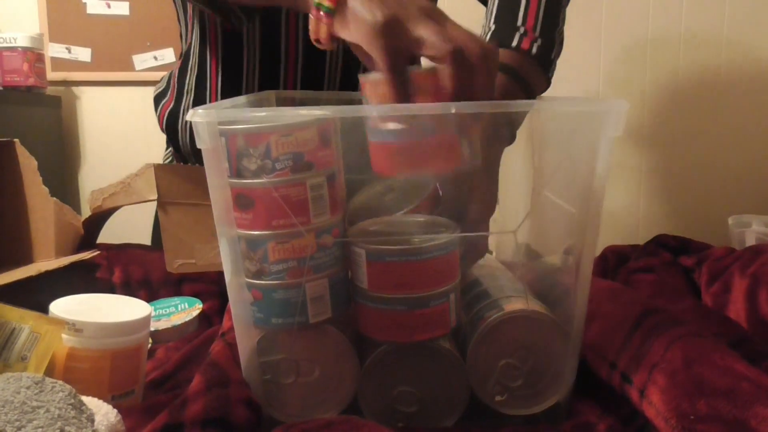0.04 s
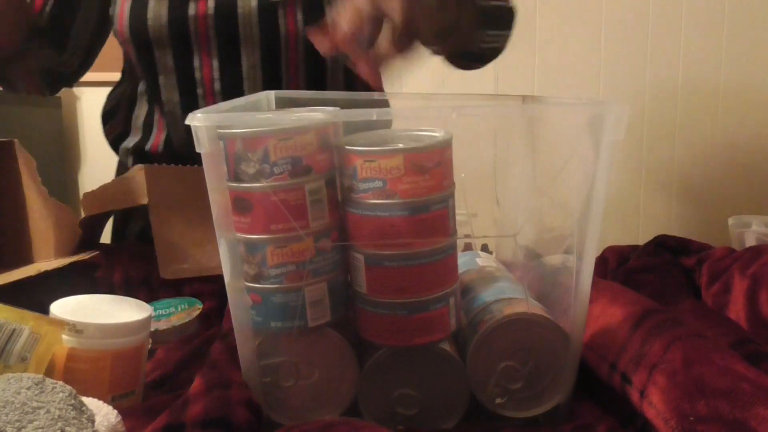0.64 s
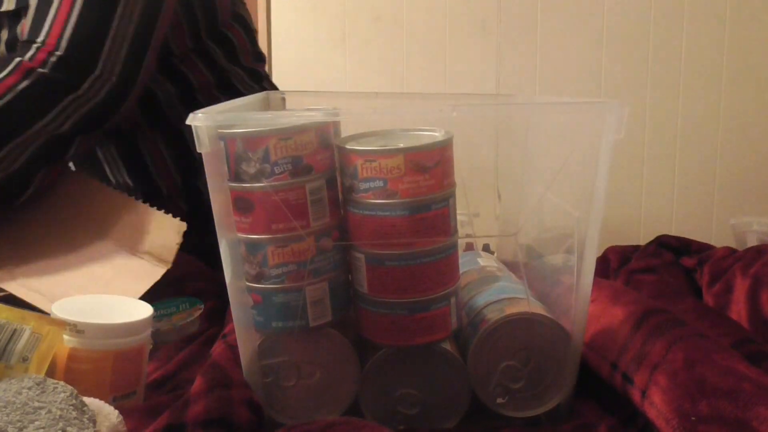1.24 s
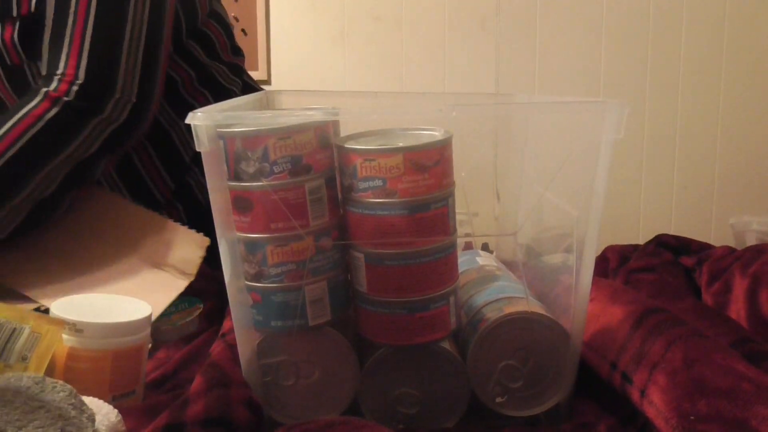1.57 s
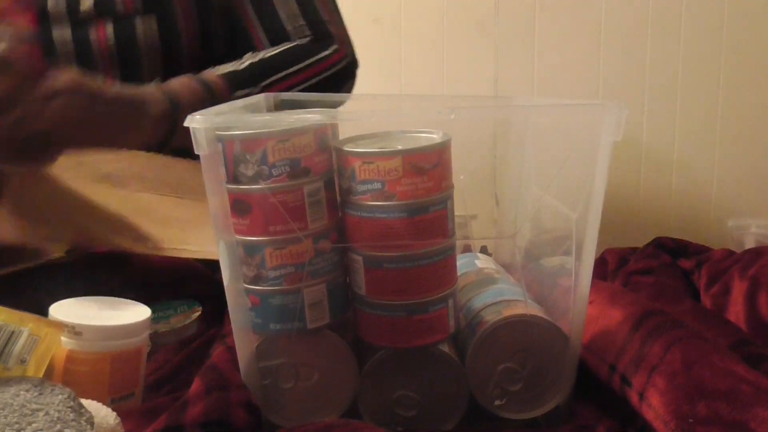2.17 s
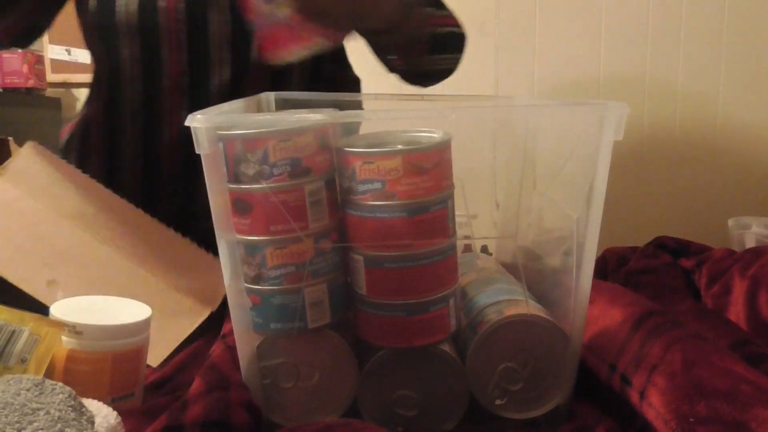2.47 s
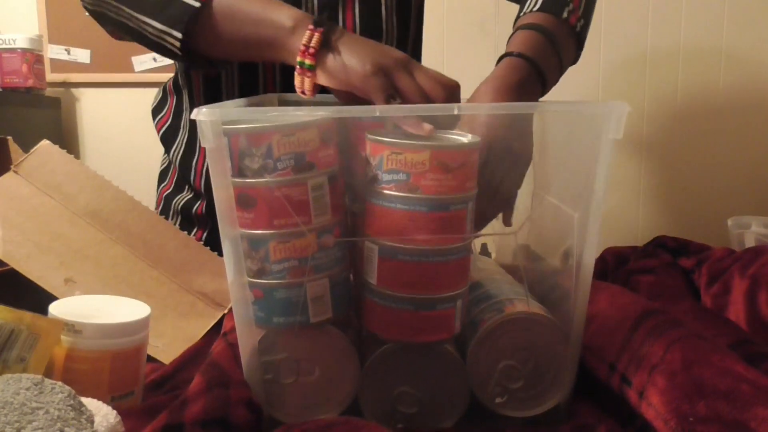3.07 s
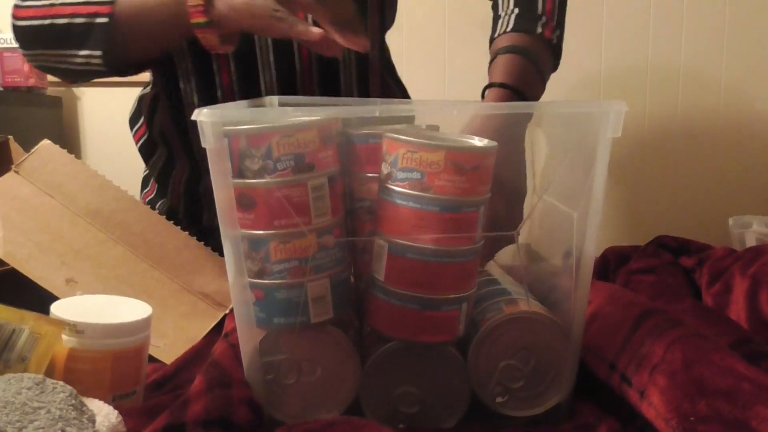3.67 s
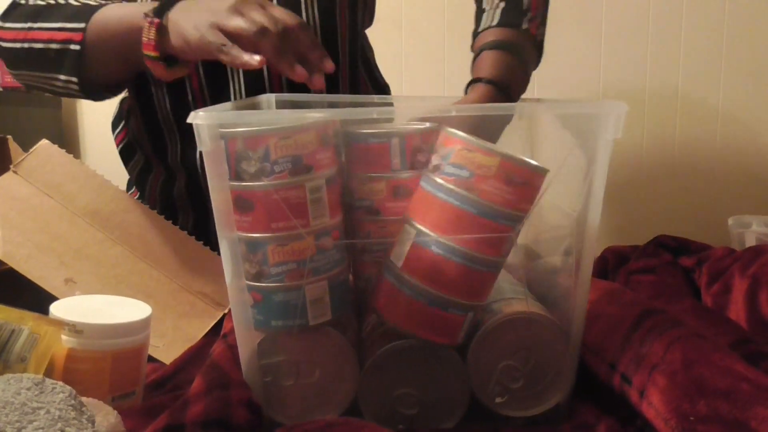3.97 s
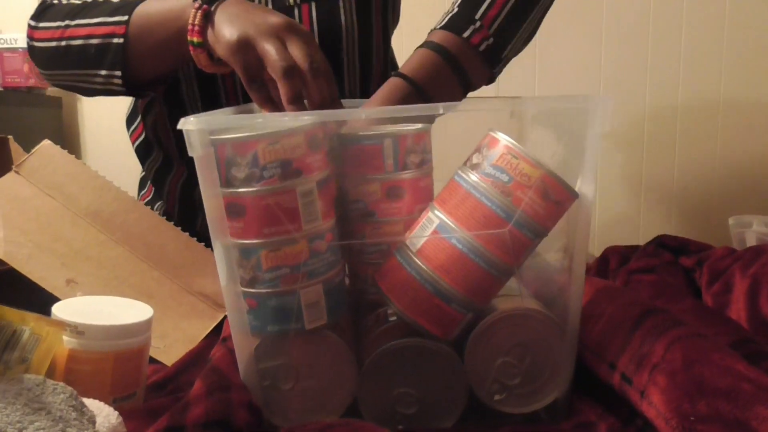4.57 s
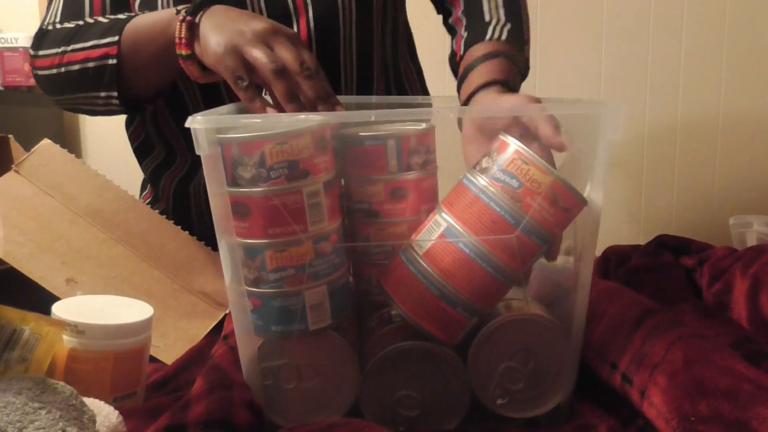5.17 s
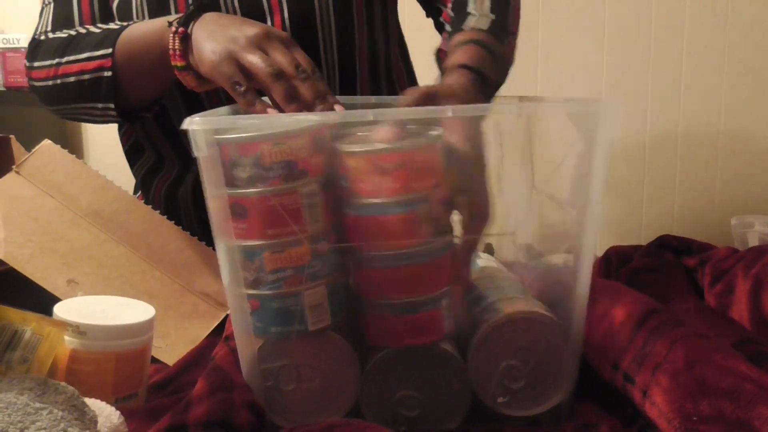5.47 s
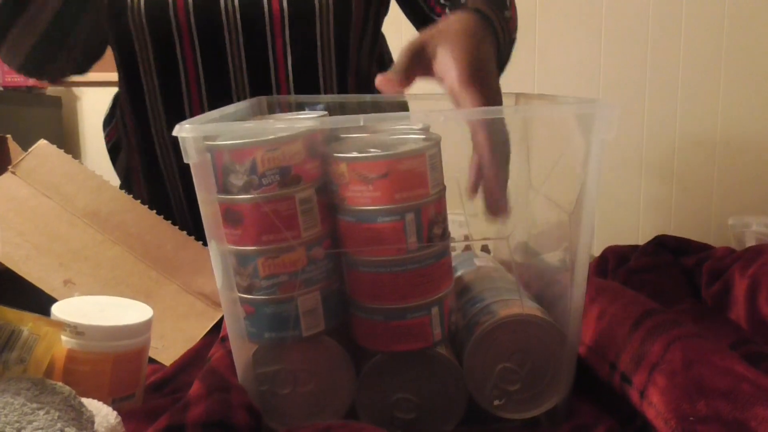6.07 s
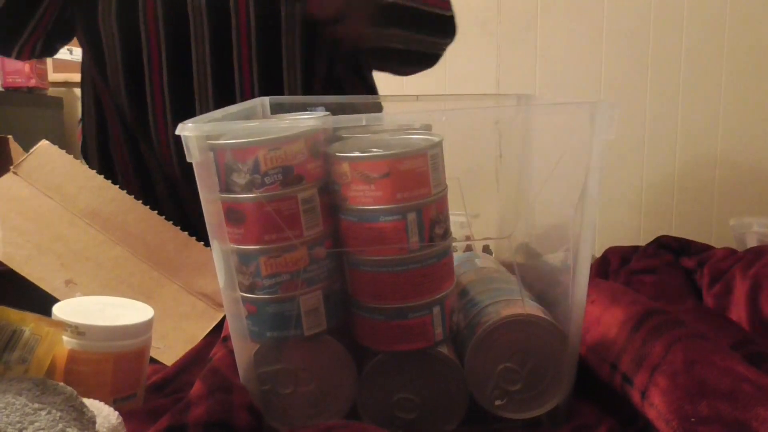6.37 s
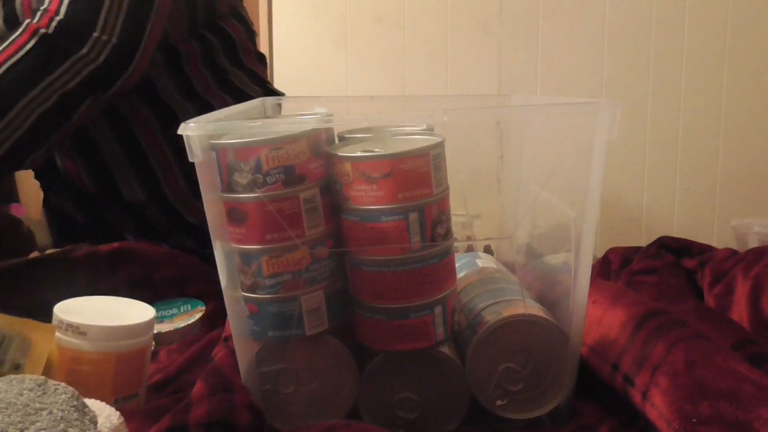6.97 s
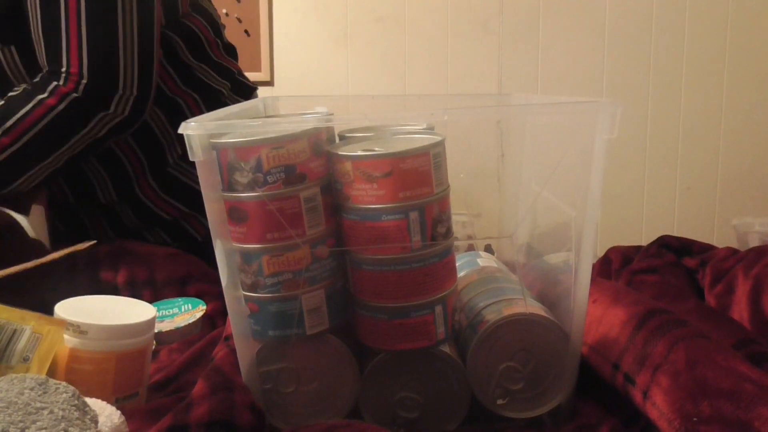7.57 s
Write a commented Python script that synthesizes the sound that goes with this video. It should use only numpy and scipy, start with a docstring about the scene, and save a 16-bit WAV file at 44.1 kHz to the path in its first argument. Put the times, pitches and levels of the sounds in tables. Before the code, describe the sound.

In a small, faintly hissing room, full metal cans knock together in a plastic storage bin ahead of a stereo microphone. A hand rummages in a paper bag a little to the left. More cans are set down and slid about, with hollow thuds, clacks and short metallic rings. After a brief lull, the paper crackles again among a few more knocks.

```python
"""Small full food cans are stacked in a plastic storage bin, straight ahead of a stereo microphone.
They thud and clatter on each other and on the bin walls, which boom briefly; now and then a rim catches
a lid and it rings. The bin stands on a blanket in a small room that hisses and drones faintly.
Twice a hand rummages for the next can in a brown paper bag, a little to the left."""
import sys
import numpy as np
from scipy import signal
from scipy.fft import rfft, irfft
from scipy.io import wavfile
from scipy.ndimage import uniform_filter1d

SR = 44100
rng = np.random.default_rng(int(sys.argv[2]) if len(sys.argv) > 2 else 0)


def digitize_waveform(pressure):
    """Quantize a signal to 16-bit integers and store it at the path in sys.argv[1].

    Rows of a 2-D input are taken as channels; values are limited to [-1, 1].
    """
    field = np.atleast_2d(pressure).T
    bounded = np.clip(field, -1, 1)
    quanta = np.round(bounded * 32767).astype(np.int16)
    wavfile.write(sys.argv[1], SR, quanta)


N = 345744
TIME = np.arange(N) / SR
AGE = TIME[:SR // 2]   # seconds since a blow
BANDS_HZ = 42 * 2 ** (np.arange(18) / 2)
LOW_HZ, MIDDLE_HZ, HIGH_HZ = 386, 1620, 6500   # where low, middle and high levels apply

# Cans knock on each other, the bin and the bag. Each row: start in seconds, strength in dB,
# thud pitch in Hz, then clack and tick in dB relative to the strength.
KNOCKS = [(0.012, -15.5, 274, -17, -25), (0.029, -5, 255, -21.5, -33), (0.08, -8, 295, -19, -26.5),
          (0.089, -8.5, 423, -18.5, -24), (0.111, -0.5, 380, -28, -30), (0.212, 0.5, 430, -21, -28),
          (0.229, -3.5, 382, -6.5, -17.5), (0.725, -25.5, 262, -17.5, -21), (0.779, -25.5, 273, -18.5, -23),
          (1.065, -23, 258, -10.5, -10), (1.112, -16, 330, -13, -32), (1.221, -6, 357, -33, -23),
          (1.764, -11, 440, -14.5, -53), (1.892, -8.5, 272, -15.5, -24), (2.033, -10.5, 310, -54, -33),
          (2.463, -17.5, 452, -15, -22), (2.489, -10, 486, -12.5, -19), (2.568, -10.5, 460, -19.5, -23.5),
          (2.709, -16.5, 194, -13, -20), (2.718, -8, 430, -22.5, -27.5), (2.866, -14.5, 380, -18, -17.5),
          (2.887, -2.5, 330, -20.5, -27), (2.954, -12.5, 312, -22, -27.5), (3.0, -8, 357, -13, -22.5),
          (3.074, -11.5, 320, -7.5, -21), (3.224, 0.5, 420, -12.5, -20), (3.298, -8.5, 300, -22.5, -22),
          (3.381, -0.5, 335, -22.5, -29.5), (3.556, -11.5, 405, -6.5, -16.5), (3.635, -13.5, 474, -12, -21),
          (3.779, -18, 374, -14, -40), (3.8, -19, 403, -5, -15), (3.882, -8.5, 370, -17.5, -27.5),
          (3.964, -13.5, 303, -24, -50), (4.029, -2.5, 346, -17, -24), (4.135, -1, 610, -16, -22.5),
          (4.186, -8.5, 376, -28, -30), (4.209, -9.5, 240, -18, -21), (4.327, -13.5, 262, -20.5, -22.5),
          (4.348, -14, 428, -28, -27), (4.537, -14, 597, -26, -26), (4.572, 2.5, 221, -18.5, -19.5),
          (4.647, -15, 220, -21, -18.5), (4.737, -20.5, 220, -17, -19.5), (4.944, -29.5, 395, 1.5, -7),
          (5.11, -26, 236, -22.5, -23), (5.307, -17.5, 270, -33, -16.5), (5.46, -12, 217, -21.5, -48),
          (5.512, -3.5, 250, -28.5, -32), (5.567, 4, 710, -16, -21), (5.664, -18.5, 388, -15, -21),
          (6.045, -30.5, 324, -17, -21), (6.694, -12.5, 440, -13, -28), (6.757, -20, 530, -1, -18.5),
          (6.809, -20, 455, -31, -46), (6.987, -21, 360, -2.5, -6.5), (7.109, -4, 450, -22, -31),
          (7.244, -22.5, 313, -3.5, -38), (7.362, -24, 250, -33, -17), (7.439, -12, 466, -3.5, -25),
          (7.555, -28, 190, -4, -11), (7.783, -8, 440, -24, -32), (7.822, -11, 305, -20.5, -30)]


def blows():
    """Every contact, rebounds included: start s, strength dB, thud Hz, clack dB, tick dB, chatter s."""
    knocks, rebounds = [], []
    for s, db, hz, clack_db, tick_db in KNOCKS:
        clack_db, tick_db = db + clack_db, db + tick_db
        chatter_s = 0.0062 * 2 ** (db / 39)   # stronger knocks chatter longer
        knocks.append((s, db, hz, clack_db, tick_db, chatter_s))
        if tick_db > -23:   # the stack rocks and lands again, softer and duller
            rebounds.append((s + 0.021, db - 5.5, hz, clack_db - 13.5, tick_db - 13.5, 0.018))
    return knocks + rebounds


def can_thuds(gain_db):
    """A heavy can pushes the bin wall, which swings for two or three cycles."""
    out = np.zeros(N)
    for s, db, hz, *_ in blows():
        cycles = AGE * hz
        swell = cycles * np.exp((1 - cycles ** 2) / 2)
        add(out, s, from_db(db + gain_db) * swell * np.sin(2 * np.pi * cycles))
    return out


# The colour of a knock at the microphone. Each row: frequency in Hz, gain in dB.
KNOCK_COLOUR = [(40, -40), (70, -27.5), (140, -6.5), (350, -3), (700, 1.5), (1000, 0.5), (1400, 0),
                (2100, -8), (3700, -2), (5800, -7.5), (10500, 0), (15000, -40)]
# The small room's decay. Each row: frequency in Hz, time to fall 60 dB in seconds (floored at 1 ms).
ROOM_DECAY = [(100, -0.06), (260, 0.58), (700, 0.3376), (1840, 0.2462), (4850, 0.155), (12800, 0.1068)]
# The room's answer to a knock. Each row: frequency in Hz, gain of the tail in dB.
ROOM_TAIL = [(100, -7.5), (400, -17), (3000, -0.5), (12000, 3)]


def rim_clatter(gain_db, crack_db, crack_s, flat_db, flat_after_s, room_build_s, bass_lag_s, hardening):
    """Rims meet with a crack and chatter for some milliseconds; the room answers with a diffuse tail."""
    out = np.zeros((2, N))
    contacts = grains(per_s=6000, spread_db=2.5)
    diffuse = rng.standard_normal((2, 2, N))
    early = AGE[:SR // 10]
    # a can touches with one edge first and drops flat a moment later
    edge = from_db(crack_db) * np.exp(-early / crack_s)
    flat = from_db(flat_db) * np.exp(-np.abs(early - flat_after_s) / crack_s)
    starts, strength_db, _, clack_db, tick_db, chatter_s = np.transpose(blows())
    levels_db = [strength_db - 11.5, clack_db - 4, tick_db - 8]   # low, middle, high
    for k, hz in enumerate(BANDS_HZ):
        direct, late = np.zeros(N), np.zeros(N)
        build = 1 - np.exp(-AGE / room_build_s)
        tail = from_db(at_hz(ROOM_TAIL, hz)) * dying(at_hz(ROOM_DECAY, hz)) * build
        # the heavier, lower motions take longer to build up and to die away
        swell = 1 - np.exp(-early / (bass_lag_s * np.sqrt(LOW_HZ / hz)))
        decays_s = chatter_s * (MIDDLE_HZ / hz) ** 0.19
        chatters = edge + flat + np.exp(-early / decays_s[:, None])
        # a harder blow makes a shorter contact, which lifts the very top
        sheen_db = hardening * (tick_db - tick_db.mean()) * (hz > HIGH_HZ)
        gains = from_db(blend(levels_db, hz) + sheen_db + at_hz(KNOCK_COLOUR, hz) + gain_db)
        for s, chatter, gain in zip(starts, chatters, gains):   # overlapping blows add in power
            add(direct, s, (gain * chatter) ** 2 * swell)
            add(late, s, (gain * tail) ** 2)
        clatter = contacts * np.sqrt(direct) + diffuse[k % 2] * np.sqrt(late)
        out += (-1) ** k * stereo(band(clatter, hz), hz)   # alternate signs join bands without a notch
    return out


# The modes of the loaded bin. Each row: frequency in Hz, gain in dB, time to fall 60 dB in seconds.
BIN_MODES = [(141, -3, 0.45), (227.3, 3, 0.09), (270.2, -5, 0.22), (323.8, 4.5, 0.13), (372.2, -3, 0.14),
             (441.8, 3.5, 0.15), (624.6, 6, 0.081), (715, -21, 0.33), (918, 3, 0.098), (1033, -12, 0.047)]


def bin_boom(gain_db, scatter_db, loss_db_per_octave):
    """Every knock rings the bin, most of all the modes near the pitch of its thud."""
    out = np.zeros(N)
    modes = np.array([from_db(db) * dying(t60) * np.sin(2 * np.pi * hz * AGE) for hz, db, t60 in BIN_MODES])
    shape = (len(KNOCKS), len(BIN_MODES))
    strengths = from_db(scatter_db * rng.standard_normal(shape)) * rng.choice([-1, 1], shape)
    for (s, db, thud_hz, *_), strength in zip(KNOCKS, strengths):
        octaves = np.abs(np.log2(np.array(BIN_MODES)[:, 0] / thud_hz))
        gains = from_db(db + gain_db - loss_db_per_octave * octaves) * strength
        add(out, s, gains @ modes)
    return out


# A rim catches a lid. Each row: start in seconds, level in dB, pitch in Hz, the main mode's time to
# fall 60 dB in seconds, gain of the other modes in dB per octave away from it.
LID_STRIKES = [(0.03, -14, 1060, 0.023, -18), (0.229, -17.5, 1402, 0.14, -6),
               (1.765, -24.5, 804, 0.18, -11), (2.36, -19, 863, 0.085, -6.5), (2.89, -26, 1444, 0.13, -4),
               (2.955, -22, 1187, 0.042, -18), (2.998, -25, 1505, 0.11, -8.5),
               (3.073, -20.5, 1590, 0.084, -3), (3.225, -18.5, 1477, 0.1, 6),
               (3.385, -18.5, 1340, 0.15, -22), (3.555, -20, 1535, 0.16, -3),
               (3.562, -21.5, 1814, 0.14, -30), (4.572, -14, 1481, 0.085, -15),
               (4.944, -33, 1506, 0.11, -3)]
# The modes of a lid, the main one first. Each row: multiple of the pitch, gain in dB.
LID_MODES = [(1, 1.5), (.82, -4), (0.951, 1), (1.04, -6), (1.085, -25), (1.195, -23.5), (1.29, -29),
             (1.401, -8), (1.673, -6.5), (1.78, -8), (1.95, -60), (2.31, -18.5), (2.46, -5.5), (3.07, -7)]


def lid_rings(gain_db, scatter_db, pan_spread_db, detune, damping):
    """A struck lid rings in inharmonic modes, the high ones briefly, each leaning left or right."""
    out = np.zeros((2, N))
    for s, strike_db, pitch_hz, t60, tilt_db in LID_STRIKES:
        bounce_samples = int(rng.uniform(.0025, .01) * SR) + 1
        for k, (multiple, mode_db) in enumerate(LID_MODES):
            strength, lean, stray = rng.standard_normal(3)
            hz = pitch_hz * multiple
            db = strike_db + gain_db + mode_db + tilt_db * abs(np.log2(multiple))
            if k > 0:   # side modes differ from can to can and with the place of contact
                hz *= 1 + detune * stray
                db += scatter_db * strength - 1.5
            envelope = from_db(db) * dying(t60 / multiple ** damping)
            tone = rng.choice([-1, 1]) * envelope * np.sin(2 * np.pi * hz * AGE)
            if k > 0:   # the rim bounces and strikes them again
                tone += 0.85 * np.pad(tone[:-bounce_samples], (bounce_samples, 0))
            add(out, s, pan(tone, pan_spread_db * lean))
    return out


# Two spells of sliding in the bin: stacking, then righting the stack.
# Each row of a spell: time in seconds, effort in dB.
SLIDES = [
    [(2.5, -26.5), (2.68, -45), (2.83, -38), (3.05, -35.5), (3.17, -39), (3.5, -44.5), (3.66, -36),
     (3.75, -43.5), (3.83, -34.5), (4.0, -28.5), (4.32, -31.5), (4.44, -57.5)],
    [(5.25, -51), (5.33, -33), (5.42, -42), (5.5, -27.5), (5.68, -31.5), (5.76, -70)],
]


def sliding_cans():
    """Cans and hands drag over the bin; rumble, scraping and hiss rise together with the effort."""
    strokes = [[(s, db + 2.5, db - 11, db - 19.5) for s, db in slide] for slide in SLIDES]
    return rubbing(strokes, gain_db=-10.5, per_s=500, spread_db=-1.0, smooth_db=0.5)


# Weight shifts on the blanket under the bin. Each row: start in seconds, level in dB.
BLANKET_BUMPS = [(1.95, -37), (2.18, -37), (2.35, -35), (2.704, -33), (2.896, -30), (3.968, -36),
                 (4.58, -32)]


def blanket_bumps(swell_s):
    """The blanket gives with a deep, heavily damped swing that swells and dies away."""
    out = np.zeros(N)
    swell = AGE / swell_s * np.exp(1 - AGE / swell_s)
    for s, db in BLANKET_BUMPS:
        hz = rng.uniform(47.45, 72.15)
        add(out, s, from_db(db) * swell * np.sin(2 * np.pi * hz * AGE))
    return out


# A hand in the bag, left of the microphone: a pull and two searches.
# Each row of a stroke: time in seconds, flapping in dB, hiss in dB.
BAG_STROKES = [
    [(0.94, -64, -57), (1.005, -47, -52), (1.045, -50, -60), (1.08, -26, -32.5), (1.24, -24, -32.5),
     (1.295, -21.5, -41), (1.385, -44, -57.5)],
    [(1.39, -45.5, -63.5), (1.52, -33, -48), (1.63, -36, -55), (1.695, -29.5, -47), (1.88, -34.5, -38),
     (1.95, -24.5, -41), (2.08, -37, -53.5), (2.155, -46, -68), (2.19, -35.5, -39), (2.245, -42, -52),
     (2.325, -26.5, -39), (2.45, -51.5, -66)],
    [(6.44, -63, -75), (6.57, -67, -48), (6.645, -37.5, -54), (6.73, -24.5, -50), (6.775, -29, -49),
     (7.035, -28.5, -44), (7.17, -23, -46), (7.325, -40.5, -45), (7.37, -26, -47), (7.51, -33.5, -56),
     (7.53, -18.5, -55), (7.645, -36, -54.5), (7.69, -24.5, -42), (7.835, -25.5, -50.5)],
]
# The paper's own resonances. Each row: frequency in Hz, width in Hz, gain in dB.
PAPER_MODES = [(468, 10, 6.5), (1444, 58, 2), (3580, 330, -3.5)]


def paper_bag():
    """Stiff paper hisses as it slides, and its creases buckle in sparse snaps."""
    # crumpling fills the middle register, about midway between flapping and hiss
    strokes = [[(s, flap_db, (flap_db + hiss_db) / 2 + 0.5, hiss_db + 1) for s, flap_db, hiss_db in rows]
               for rows in BAG_STROKES]
    sliding = rubbing(strokes, gain_db=-8.0, per_s=900, spread_db=-0.5, smooth_db=1.5)
    snaps = rubbing(strokes, gain_db=-12.5, per_s=100, spread_db=3.0, smooth_db=-15.0)
    crackle = sliding + resonate(snaps, hz=870, width_hz=760)
    crackle *= stick_slip(per_s=20, depth_db=1.5)
    ringing = sum(from_db(db) * resonate(crackle, hz, width_hz) for hz, width_hz, db in PAPER_MODES)
    left, right = crackle + ringing
    return np.array([left, np.roll(right, 1)])   # it reaches the left of the microphone first


def hands_in_bag():
    """1 while the hands work in the bag, easing to 0 while they are at the bin."""
    busy = np.any([(TIME >= rows[0][0]) & (TIME <= rows[-1][0]) for rows in BAG_STROKES], axis=0)
    return uniform_filter1d(busy.astype(float), size=SR // 20)


# The colour of rubbing, at the bin and at the bag. Each row: frequency in Hz, gain in dB.
RUB_COLOUR = [(40, -31), (70, -20), (140, -8), (300, -1), (750, -3.5), (1500, -5.5), (2200, -7), (3700, -1),
              (5500, -6), (7800, 3), (10500, 1.5), (15000, -16)]


def rubbing(strokes, gain_db, per_s, spread_db, smooth_db):
    """Surfaces catch and slip in tiny snaps, over a smooth hiss of friction."""
    out = np.zeros((2, N))
    friction = unit_rms(grains(per_s, spread_db) + from_db(smooth_db) * rng.standard_normal((2, N)))
    friction *= stick_slip(per_s=70, depth_db=2.0)
    for k, hz in enumerate(BANDS_HZ):
        force = np.zeros(N)
        for stroke in strokes:
            times, *levels_db = np.transpose(stroke)
            during = TIME[(TIME >= times[0]) & (TIME <= times[-1])]
            stroke_db = np.interp(during, times, blend(levels_db, hz))
            add(force, during[0], from_db(stroke_db + at_hz(RUB_COLOUR, hz) + gain_db))
        out += (-1) ** k * stereo(band(friction * force, hz), hz)
    return out


def stick_slip(per_s, depth_db):
    """Friction grips and lets go unevenly: a gain that wanders in dB."""
    knots = np.arange(0, TIME[-1] + 1, 1 / per_s)
    wander = np.interp(TIME, knots, rng.standard_normal(len(knots)))
    return unit_rms(from_db(depth_db * wander))


# Squeaks, swishes and snaps of fingers, sleeves and paper.
# Each row: start in seconds, level in dB, frequency in Hz, resonator width in Hz, decay in seconds.
SQUEAKS = [(0.146, -37, 8000, 9000, 0.0044), (0.687, -43.5, 7000, 9000, 0.0033),
           (1.005, -42, 6000, 8000, 0.005), (2.183, -41, 8700, 4000, 0.017),
           (5.388, -34.5, 4070, 1140, 0.015), (6.204, -47.5, 8200, 6000, 0.074),
           (6.282, -43, 6800, 3000, 0.023), (6.66, -37.5, 1940, 2430, 0.015),
           (6.988, -18, 8250, 9000, 0.0017), (7.175, -37.5, 3400, 700, 0.032)]


def squeaks():
    """Skin, cloth or paper slips briefly and excites one high resonance."""
    out = np.zeros((2, N))
    for s, db, hz, width_hz, decay_s in SQUEAKS:
        noise = rng.standard_normal((2, len(AGE)))
        slip = unit_rms(resonate(resonate(noise, hz, width_hz), hz, width_hz))
        add(out, s, stereo(from_db(db) * slip * np.exp(-AGE / decay_s), hz))
    return out


# The still room around the microphone. Each row: frequency in Hz, level in dB per half octave.
ROOM_HISS = [(40, -76.5), (70, -63), (110, -59), (165, -57.5), (240, -55.5), (400, -57.5), (650, -62.5),
             (950, -61), (2000, -68.5), (5500, -70.5), (9500, -64), (15000, -69.5)]
# The room's faint drone. Each row: frequency in Hz, width in Hz, level in dB.
ROOM_DRONE = [(169.6, 27, -48.5), (247, 62, -60.5), (913, 65, -60.5)]


def room_tone():
    """Steady hiss with a few narrow droning resonances."""
    hz = np.fft.rfftfreq(N, 1 / SR) + 1
    half_octave_hz = np.maximum(hz, BANDS_HZ[0]) * np.log(2) / 2
    power = from_db(at_hz(ROOM_HISS, hz)) ** 2 / half_octave_hz
    for centre, width, db in ROOM_DRONE:
        power += from_db(db) ** 2 / width * np.exp(-np.pi * ((hz - centre) / width) ** 2)
    spectrum = rfft(rng.standard_normal((2, N))) * np.sqrt(power * SR / 2)
    return irfft(stereo(spectrum, hz), N)


# The stereo width at the microphone. Each row: frequency in Hz, side minus mid in dB.
STEREO_WIDTH = [(300, -12.5), (1400, -8), (2500, -9.5), (4400, -6.5), (8000, -3.5)]


def stereo(pair, hz):
    """Two unrelated signals become left and right, alike in the bass and wide in the treble."""
    mid, side = pair
    return mid + from_db(at_hz(STEREO_WIDTH, hz)) * side * np.array([[1], [-1]])


def pan(x, left_db):
    """Lean a sound to the left, by a steady or a changing amount."""
    return x * from_db(np.array([[1], [-1]]) * left_db / 2)


def grains(per_s, spread_db):
    """Two trains of tiny contacts with shared moments and uneven sizes; rms 1."""
    born = rng.random(N) < per_s / SR
    sizes = from_db(spread_db * np.minimum(rng.exponential(1, N), 4))
    return unit_rms(born * sizes * rng.choice([-1, 1], (2, N)))


def resonate(x, hz, width_hz):
    """A resonance with gain 1 at its top."""
    radius = np.exp(-np.pi * width_hz / SR)
    feedback = [1, -2 * radius * np.cos(2 * np.pi * hz / SR), radius ** 2]
    return signal.lfilter(np.array([1, 0, -1]) * (1 - radius ** 2) / 2, feedback, x)


def band(x, hz):
    """Half-octave band-pass that keeps white noise at its rms."""
    low, high = hz / 2 ** .25, hz * 2 ** .25
    sos = signal.butter(2, [low, high], "band", fs=SR, output="sos")
    return signal.sosfilt(sos, x + 1e-18) * np.sqrt(SR / 2 / (high - low))


def dying(t60):
    """Envelope that falls 60 dB in t60 seconds."""
    return np.exp(-np.log(1000) * AGE / max(t60, .001))


def at_hz(points, hz):
    """Read a spectrum on a log-frequency axis."""
    freqs, values = np.transpose(points)
    return np.interp(np.log(hz), np.log(freqs), values)


def blend(levels, hz):
    """Level at hz between a low, a middle and a high level."""
    shares = [np.interp(np.log(hz), np.log([LOW_HZ, MIDDLE_HZ, HIGH_HZ]), row) for row in np.eye(3)]
    return sum(level * share for level, share in zip(levels, shares))


def add(track, s, sound):
    """Mix a sound into a mono or stereo track at s seconds."""
    start = round(s * SR)
    track[..., start:start + sound.shape[-1]] += sound[..., :N - start]


def from_db(db):
    """Decibels to gain."""
    return 10 ** (np.asarray(db) / 20)


def unit_rms(x):
    """Scale to rms 1."""
    return x / np.sqrt(np.mean(x ** 2) + 1e-20)


def scene():
    """The bin stands straight ahead; all handling leans left while the hands are in the bag."""
    thuds = can_thuds(gain_db=-5.0)
    boom = bin_boom(gain_db=-14.5, scatter_db=2.0, loss_db_per_octave=8.0)
    bumps = blanket_bumps(swell_s=0.024)
    lids = lid_rings(gain_db=-3.5, scatter_db=5.0, pan_spread_db=4.0, detune=0.02, damping=0.72)
    rims = rim_clatter(gain_db=-2.0, crack_db=5.0, crack_s=0.00046, flat_db=-3.0, flat_after_s=0.0056,
                       room_build_s=0.0036, bass_lag_s=0.0021, hardening=0.2)
    handling = thuds + boom + bumps + lids + rims + sliding_cans() + paper_bag() + squeaks()
    return pan(handling, left_db=0.85 * hands_in_bag()) + room_tone()


def record(dry):
    """The microphone sheds the deepest rumble, the loudest knocks are rounded off, the top is cut."""
    heard = signal.sosfilt(signal.butter(2, 42, "high", fs=SR, output="sos"), dry)
    rounded = heard / (1 + np.abs(heard) ** 6) ** (1 / 6)
    return signal.sosfilt(signal.ellip(10, .1, 80, 16000, fs=SR, output="sos"), rounded)


dry = scene()
out = record(dry)
digitize_waveform(out)
```